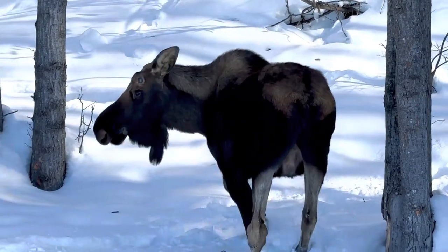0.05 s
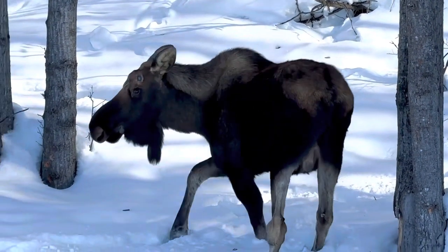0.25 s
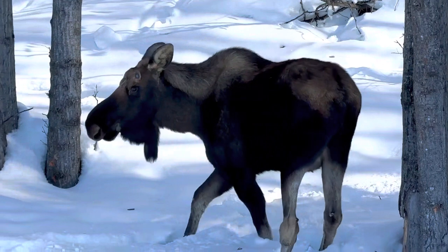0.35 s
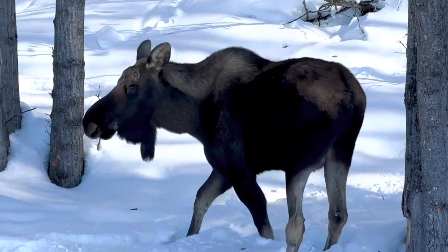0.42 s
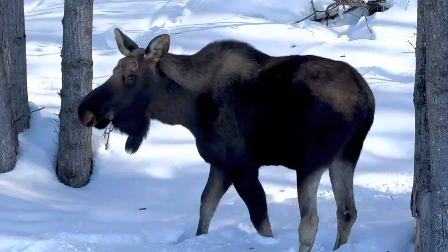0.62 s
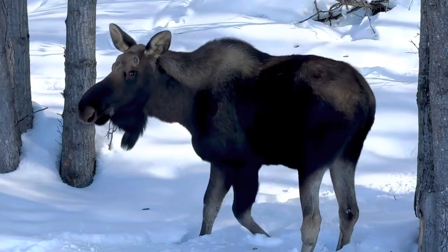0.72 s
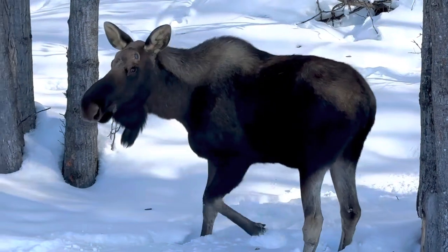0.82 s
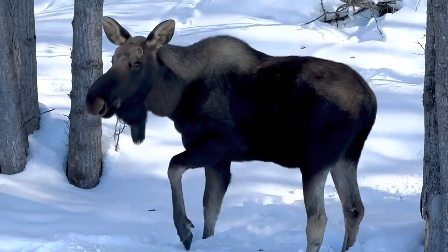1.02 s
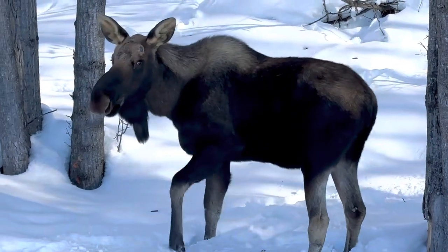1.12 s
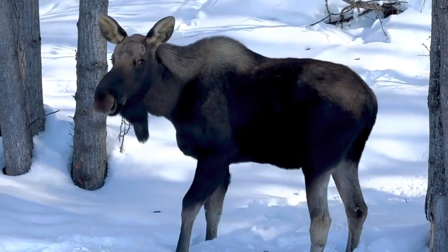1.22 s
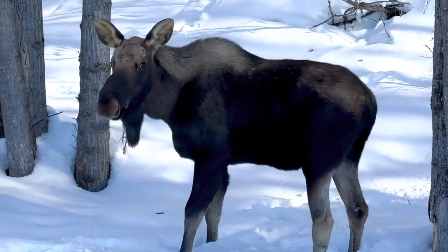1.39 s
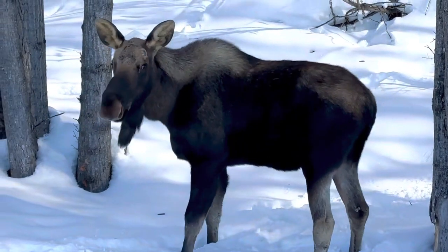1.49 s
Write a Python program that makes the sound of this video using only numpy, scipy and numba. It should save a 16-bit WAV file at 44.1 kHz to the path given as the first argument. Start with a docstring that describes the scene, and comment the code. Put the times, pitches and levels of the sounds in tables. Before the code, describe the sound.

A single rough animal bark, then a moose's hooves crunch softly through snow.

```python
"""One short, harsh bark rings out in a snowy wood, where a moose is walking a few metres away.
Rough pulses and rushing air make the throat ring while three shaky squeals overlap, the highest last.
The trees send back a faint tail. Hooves press into the snow with a crunch, a squeak and a thud.
Under it all lie a low idling hum and quiet air; a low drone swells near the end."""
import sys
import numpy as np
from scipy import signal
from scipy.fft import rfft, irfft
from scipy.io import wavfile
from scipy.ndimage import uniform_filter1d, minimum_filter1d, map_coordinates
from numba import njit

SR = 44100
rng = np.random.default_rng(int(sys.argv[2]) if len(sys.argv) > 2 else 0)


def log_audio(samples):
    """Write samples as a 16-bit WAV file to the path given in sys.argv[1]."""
    # one column per channel
    frames = np.atleast_2d(samples).T
    # limit to full scale, then quantise
    limited = np.clip(frames, -1, 1)
    pcm = np.round(limited * 32767).astype(np.int16)
    wavfile.write(sys.argv[1], SR, pcm)


N = 68355
T = np.arange(N) / SR
F = np.fft.rfftfreq(N, 1 / SR)
ROUGH_HZ = 403  # how fast the squeals shake in pitch and level


def undb(db):
    """Turn decibels into a gain to multiply by."""
    return 10 ** (np.asarray(db) / 20)


def unit(x, where=None):
    """Scale to an average (rms) level of 1, weighted by a loudness curve if given."""
    return x / np.sqrt(np.average(x ** 2, weights=None if where is None else where ** 2 + 1e-12))


def curve(rows, col=1):
    """Join a table's points with straight lines over time."""
    rows = np.array(rows)
    return np.interp(T, rows[:, 0], rows[:, col])


def over_hz(rows):
    """Join a table's points over log frequency."""
    rows = np.array(rows)
    return np.interp(np.log(F + 1), np.log(rows[:, 0]), rows[:, 1])


def burst(rows, col=1):
    """Gain from a table of levels, silent before and after it."""
    return undb(curve(rows, col)) * (T > rows[0][0]) * (T < rows[-1][0])


def noise():
    """White noise."""
    return rng.standard_normal(N)


def shape(x, gain):
    """Filter with one gain for each frequency."""
    return irfft(rfft(x) * gain, N)


def resonate(x, hz, width_hz):
    """Keep a band around hz, filtering twice for steep sides."""
    b, a = signal.iirpeak(hz, hz / (1.57 * width_hz), fs=SR)
    return signal.lfilter(b, a, signal.lfilter(b, a, x))


def noise_band(hz, width_hz):
    """Noise that rings around one pitch."""
    return unit(resonate(noise(), hz, width_hz))


def wander(hz):
    """A smooth random wobble of size 1, mostly slower than hz."""
    return unit(shape(noise(), np.exp(-(F / hz) ** 2)))


def spread(make):
    """Make a sound twice, as middle and side, for a wide stereo pair."""
    # stereo width: f/Hz, side minus middle/dB
    width = [(60, -8), (200, -13.5), (700, -4.5), (1300, -7), (3500, -41), (8000, 5), (15000, -14.5)]
    return make() + shape(make(), undb(over_hz(width))) * np.array([[1], [-1]])


def idling_hum(waver_db=-0.5, drift=0.0087):
    """Something idles far away: four low tones waver in level and pitch."""
    # tones of the hum: f/Hz, relative level/dB
    tones = [(38.2, -6.5), (76.4, 0), (114.6, -12), (158, -17)]
    # rise and fall of the whole hum: t/s, level/dB
    levels = [(0.0, -46), (0.08, -40.5), (0.188, -37), (0.232, -48), (0.708, -41.5), (0.754, -60),
              (0.91, -39), (0.958, -49), (1.138, -37), (1.246, -55.5), (1.33, -41.5)]
    hum = 0
    for hz, db in tones:
        gain = undb(db + waver_db * wander(4.4)) * np.sqrt(2)
        cycles = rng.random() + np.cumsum(hz * (1 + drift * wander(1.8))) / SR
        hum += gain * np.sin(2 * np.pi * cycles)
    return hum * undb(curve(levels))


def still_air(level_db=-45):
    """Quiet air: a soft, deep, steady noise."""
    # tone colour of the air: f/Hz, relative level/dB
    colour = [(20, -15.5), (35, -1), (60, -1), (110, -2.5), (170, -7.5), (250, -12), (450, -20),
              (900, -21.5), (1300, -29.5), (1600, -27.5), (2000, -34), (3000, -37.5), (4500, -49.5),
              (9000, -59)]
    return undb(level_db) * spread(lambda: unit(shape(noise(), undb(over_hz(colour)))))


def faint_ring():
    """A thin ringing hangs in the air."""
    # strength of the ring: t/s, level/dB
    levels = [(0, -62.5), (.82, -69), (.89, -60), (1.22, -60.5), (1.4, -68)]
    return undb(curve(levels)) * noise_band(1585, width_hz=110)


def snow_grains(graininess=0.26):
    """Crushed snow: many tiny grains make a noise that flickers quickly."""
    # tone colour of the crunch: f/Hz, relative level/dB
    colour = [(800, 6), (2000, -8), (4000, -2), (7000, -3), (10000, -4), (15000, -11.5)]
    return unit(shape(noise() * np.exp(graininess * wander(1900)), undb(over_hz(colour))))


def rustle():
    """A fine, grainy rustle comes and goes in the air."""
    # strength of the rustle: t/s, level/dB
    levels = [(0, -65), (.36, -67), (.5, -73), (.66, -66), (.78, -69.5), (1.0, -74.5), (1.15, -68.5),
              (1.33, -81), (1.55, -81.5)]
    return undb(curve(levels)) * spread(snow_grains)


def press(start, decay_s, attack_s=.009):
    """Loudness of one press on snow: it rises quickly, then dies away."""
    rise = np.clip((T - start) / attack_s + 1, 0, 1) ** 2
    return rise * np.exp(-np.maximum(T - start, 0) / decay_s)


def hooves():
    """Each step crunches, squeaks and thuds; packed snow chirps; the heaviest step also knocks."""
    # hooves in snow: t/s, decay/s, crunch/dB, squeak/dB, thud/dB
    steps = [(0.111, 0.035, -69, -64, -70), (0.669, 0.042, -62, -60, -43), (0.832, 0.076, -65, -89, -75),
             (0.88, 0.053, -67, -54.5, -66), (1.083, 0.069, -64, -55.5, -53)]
    # tiny squeaks of packed snow: t/s, f/Hz, level/dB
    chirps = [(.72, 4700, -68), (.9, 5100, -67)]
    crunch = spread(snow_grains)
    squeak = spread(lambda: noise_band(1680, width_hz=750))
    thud = spread(lambda: noise_band(167, width_hz=67))
    out = 0
    for start, decay_s, crunch_db, squeak_db, thud_db in steps:
        step = undb(crunch_db) * crunch + undb(squeak_db) * squeak + undb(thud_db) * thud
        out += press(start, decay_s) * step
    for start, hz, db in chirps:
        out += undb(db) * press(start, decay_s=.007) * noise_band(hz, width_hz=300)
    knock = spread(lambda: noise_band(765, width_hz=71))
    return out + undb(-44) * press(.674, decay_s=.012) * knock


def rattle(rate_hz=338.8, jitter=.3, air_share=0.88):
    """Throat tissue slaps unevenly, with a puff of air each time. Gives the mix and the puffs alone."""
    cycles = np.cumsum(rate_hz * np.exp(jitter * wander(rate_hz))) / SR
    slaps = np.diff(np.floor(cycles), prepend=0) * undb(1.2 * wander(rate_hz))
    puffs = unit(noise() * (0.52 + np.exp(-(cycles % 1) / 0.56)))
    return np.sqrt(1 - air_share) * unit(slaps) + np.sqrt(air_share) * puffs, puffs


def rasp_and_hiss(pulses, puffs, mouth_hz=2100, hiss_rise_db_per_s=25.5):
    """The pulses rasp and the air hisses; the opening mouth lets out more treble."""
    # force of the bark: t/s, relative level/dB
    force = [(.178, -61.5), (.186, -37), (.194, -24), (.204, -16), (.238, -15), (.258, -12), (.282, -21),
             (.297, -29.5), (.304, -38), (.332, -61)]
    # how wide the mouth is open: t/s, treble gain/dB
    opening = [(.18, -14.5), (.218, -3), (.24, 4), (.285, 2.5), (.31, 4.5)]
    # tone colours of the rasp and the hiss: f/Hz, relative level/dB
    rasp_colour = [(150, -49), (400, -46), (520, -11), (850, 4), (1300, -6.5), (1700, 1.5), (2200, -6),
                   (2900, -14.5), (3750, -21), (4100, -38), (6000, -62)]
    hiss_colour = [(3000, -36), (4200, -7), (4750, -0.5), (5800, 0.5), (7300, 0.5), (9450, 2.5),
                   (10600, -13.5), (13000, -22.5), (15200, -21)]
    effort, mouth = burst(force), undb(curve(opening))
    rasp = unit(shape(pulses, undb(over_hz(rasp_colour))), effort)
    dull = shape(rasp, 1 / (1 + (F / mouth_hz) ** 10))
    rasp = dull + mouth * (rasp - dull)
    hiss = mouth * unit(shape(puffs, undb(over_hz(hiss_colour))), effort)
    hiss_db = -21.5 + hiss_rise_db_per_s * (T - .25)
    return effort * (undb(-2) * rasp + undb(hiss_db) * hiss)


def gate(start, end, swell_s=0.013, fade_s=0.017):
    """Swell, hold and fade."""
    return np.clip((T - start) / swell_s + .5, 0, 1) * np.clip((end - T) / fade_s + .5, 0, 1)


def shaky_phase(rows, jitter=0.028):
    """Phase of a tone that follows a table's pitch and shakes around it."""
    return 2 * np.pi * np.cumsum(curve(rows) * (1 + jitter * wander(ROUGH_HZ))) / SR


def rough_tone(phase, shimmer_db=2):
    """One tone whose level trembles."""
    return np.sqrt(2) * np.sin(phase) * undb(shimmer_db * wander(ROUGH_HZ))


def squeals():
    """Whistling membranes make three overlapping squeals, from low to high."""
    # path of each squeal: t/s, f/Hz, level/dB
    low = [(.176, 530, -66), (.186, 532, -31), (.212, 554, -26.5), (.235, 579, -21.5), (.255, 600, -25),
           (.272, 588, -39)]
    middle = [(.228, 850, -44.5), (.246, 838.3, -22), (.272, 823.8, -29.5), (.292, 833, -18.5),
              (.303, 848, -35.5), (.32, 855, -57.5)]
    high = [(.254, 937.6, -36), (.266, 915.8, -13), (.280, 936.4, -15.5), (.298, 918, -34.5),
            (.32, 917, -53.5)]
    low_phase, high_phase = shaky_phase(low), shaky_phase(high)
    out = burst(low, 2) * rough_tone(low_phase)
    out += undb(-15.5) * gate(.226, .263) * rough_tone(2 * low_phase)  # its octave breaks through
    out += burst(middle, 2) * rough_tone(shaky_phase(middle))
    return out + burst(high, 2) * (rough_tone(high_phase) + undb(-12) * rough_tone(2 * high_phase))


def throat(pulses, wobble_s=.00007, wobble_hz=45):
    """The pulses make the throat ring; its soft walls bend each pitch slightly up and down."""
    # throat resonances: start/s, end/s, f/Hz, width/Hz, level/dB
    resonances = [(.197, .262, 1410, 110, -24.5), (0.211, .264, 1613, 120, -16),
                  (0.2008, .217, 2040, 150, -22.5), (0.25, .27, 1930, 300, -18),
                  (.224, 0.279, 2380, 320, -24), (.222, .27, 3420, 150, -32.5),
                  (0.25, .278, 3000, 200, -34), (0.22, .295, 1463, 260, -27.5), (0.2, .296, 1100, 230, -30),
                  (.287, .307, 700, 170, -33)]
    out = 0
    for start, end, hz, width_hz, db in resonances:
        loudness = gate(start, end)
        bent_time = T + wobble_s * wander(wobble_hz)
        ringing = map_coordinates(resonate(pulses, hz, width_hz), [bent_time * SR], mode="mirror")
        out += undb(db) * loudness * unit(ringing, loudness)
    return out


def side_cavity(x, hz=4193, width_hz=270, dip_db=-7.5):
    """A side pocket of the throat swallows one band of treble."""
    return shape(x, undb(dip_db * np.exp(-((F - hz) / width_hz) ** 2)))


def bark(gain_db=1):
    """One hard push of air drives the rasp, hiss, ringing throat and squeals."""
    pulses, puffs = rattle()
    voice = rasp_and_hiss(pulses, puffs) + throat(pulses) + squeals()
    return undb(gain_db) * side_cavity(voice)


def direct_sound(x):
    """The bark reaches left and right with different strength and timing."""
    # balance: f/Hz, left minus right/dB
    balance = [(300, 1.5), (560, -6), (830, -6.5), (920, -7), (1030, -8.5), (1200, 6.5), (1400, 5.5),
               (1650, 1.5), (2200, -0.5)]
    # how far the left side is ahead: f/Hz, phase/rad
    lead = [(430, -2), (600, -2), (790, -3), (850, -0.6), (910, 2), (1200, 1.4), (1400, 0.75),
            (1800, -0.03), (3000, 1), (6800, -0.17), (7800, 2.5), (8800, 2.5), (9800, 0), (15000, 1)]
    ratio, turn = undb(over_hz(balance)), np.exp(.5j * over_hz(lead))
    right = np.sqrt(2 / (1 + ratio ** 2))
    return np.array([shape(x, right * ratio * turn), shape(x, right / turn)])


def tree_scatter(x, level_db=-35.5, fall_60_db_s=0.33, dull_above_hz=5000):
    """Many trunks scatter the sound into a weak, dull tail."""
    tail = spread(noise) * undb(-60 * T / fall_60_db_s)
    tail /= np.sqrt(np.sum(tail[0] ** 2))
    tail = shape(tail, 1 / (1 + 1j * F / dull_above_hz))
    return undb(level_db) * signal.fftconvolve(tail, x[None], axes=1)[:, :N]


def echoes(x, far_delay_s=.102, far_db=-38.5):
    """Dull copies bounce back from nearby; the band of the highest squeal also returns from afar."""
    # bounces off snow and trunks: delay/s, level/dB, dull above/Hz
    bounces = [(.0023, -18.5, 9000), (.0071, -24, 6040)]
    near = sum(undb(db) * shape(x, np.exp(-2j * np.pi * F * delay) / (1 + (F / hz) ** 2))
               for delay, db, hz in bounces)
    far = shape(resonate(x, 930, width_hz=140), np.exp(-2j * np.pi * F * far_delay_s))
    return near + undb(far_db) * far


def drone(hz=159.8, octave_db=-11.5):
    """A low tone and its octave swell briefly near the end."""
    # swell of the drone: t/s, level/dB
    levels = [(1.3, -73), (1.41, -47), (1.55, -51.5)]
    phase = 2 * np.pi * hz * T
    return burst(levels) * np.sqrt(2) * (np.sin(phase) + undb(octave_db) * np.sin(2 * phase))


def scene():
    """The bark and its echoes over the hooves and a quiet background."""
    call = bark()
    foreground = direct_sound(call) + echoes(call) + tree_scatter(call) + hooves()
    lean_left = undb([[0.68], [-0.68]])
    return foreground + (idling_hum() + still_air() + drone()) * lean_left + faint_ring() + rustle()


@njit
def follow(x, attack_s, release_s):
    """Track a level, rising quickly and falling more slowly."""
    out, level = np.empty(len(x)), 0.
    for i in range(len(x)):
        level += (x[i] - level) / (SR * (attack_s if x[i] > level else release_s))
        out[i] = level
    return out


def record(dry, limit_db=-4.5, top_hz=15700, edge_s=.005):
    """A fast limiter holds the bark down; filters remove a narrow treble band and the very top."""
    level = follow(np.abs(dry).max(axis=0), attack_s=.00015, release_s=.008)
    gain = np.minimum(1, undb(limit_db) / (level + 1e-9))
    gain = uniform_filter1d(minimum_filter1d(gain, size=90), size=90)  # smooth over about 2 ms
    notch = signal.butter(4, (7850, 8750), "bandstop", fs=SR, output="sos")
    lowpass = signal.ellip(10, .2, 80, top_hz, fs=SR, output="sos")
    edge_fades = np.minimum(1, np.minimum(T, T[-1] - T) / edge_s)
    return signal.sosfilt(lowpass, signal.sosfilt(notch, dry * gain)) * edge_fades


dry = scene()
out = record(dry)
log_audio(out)
```